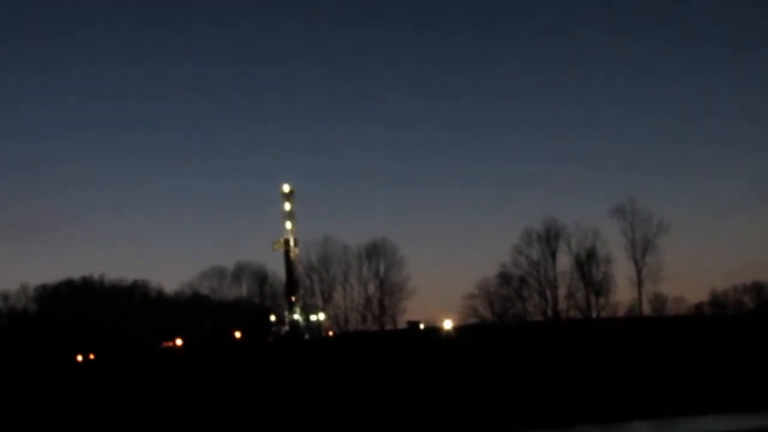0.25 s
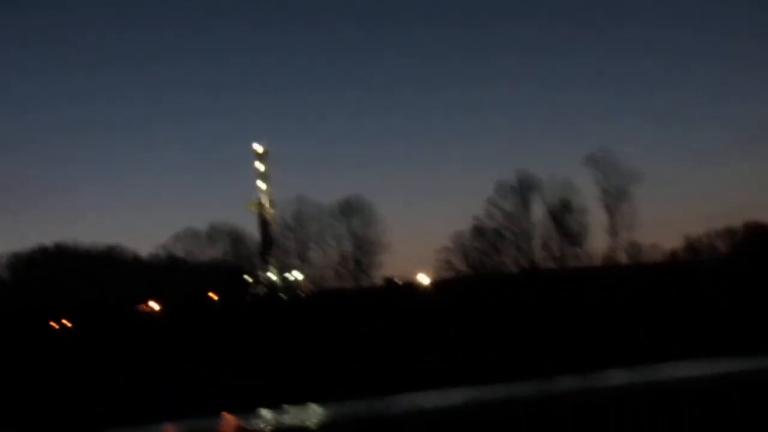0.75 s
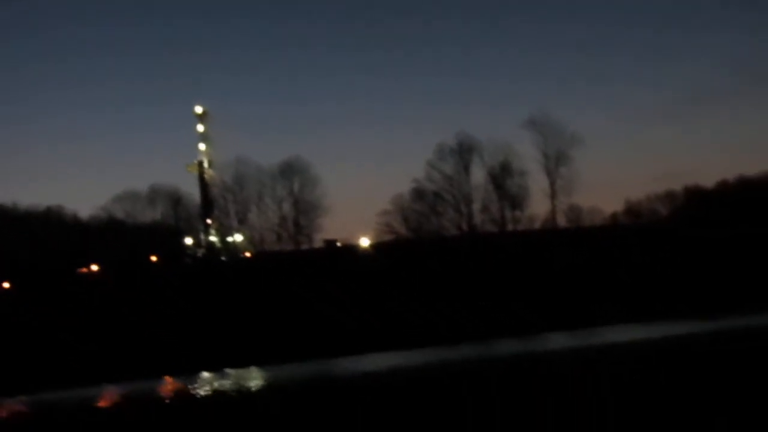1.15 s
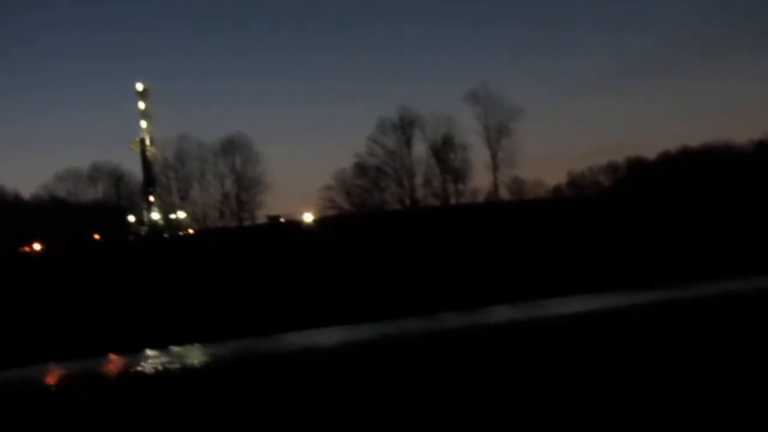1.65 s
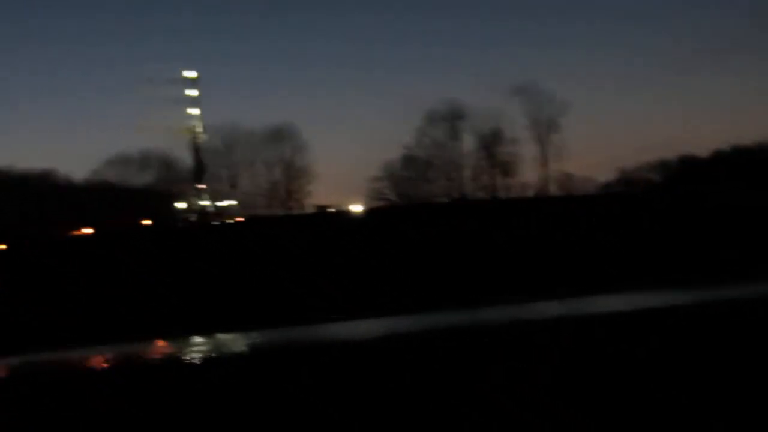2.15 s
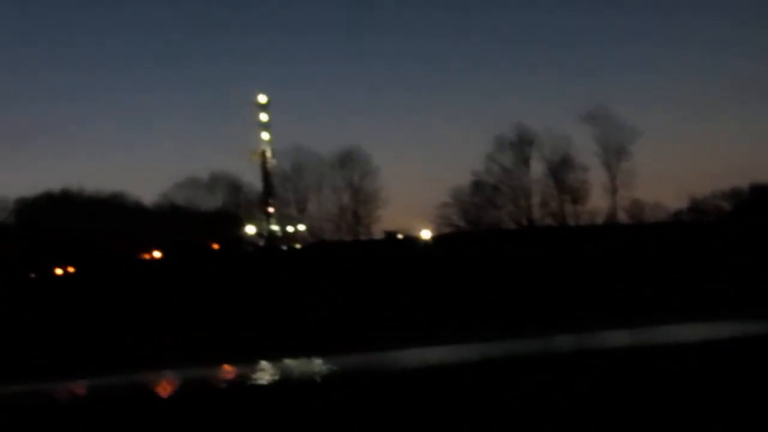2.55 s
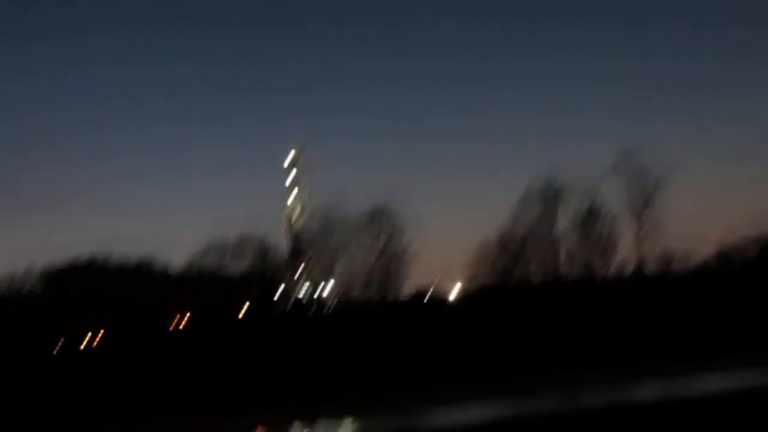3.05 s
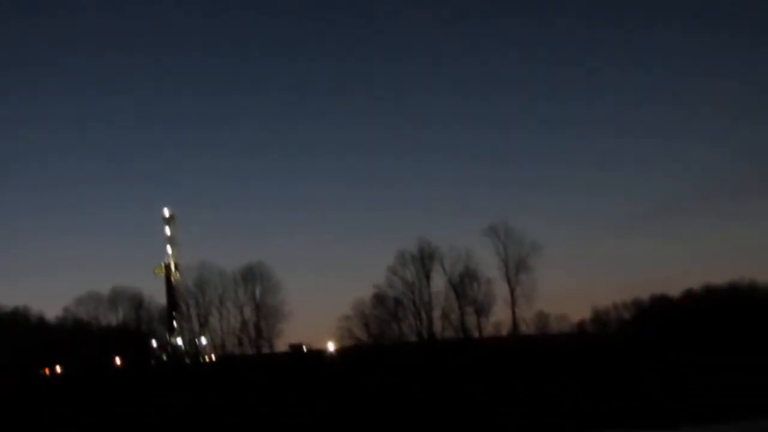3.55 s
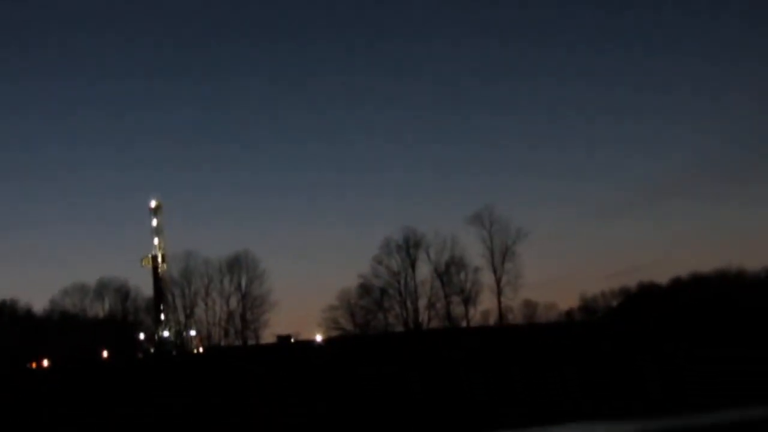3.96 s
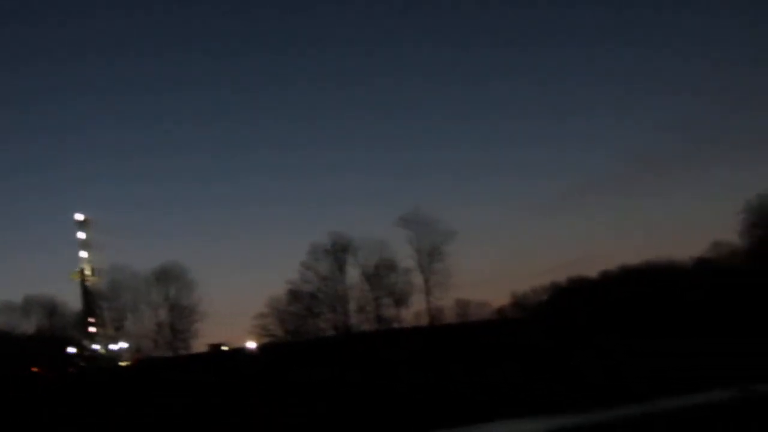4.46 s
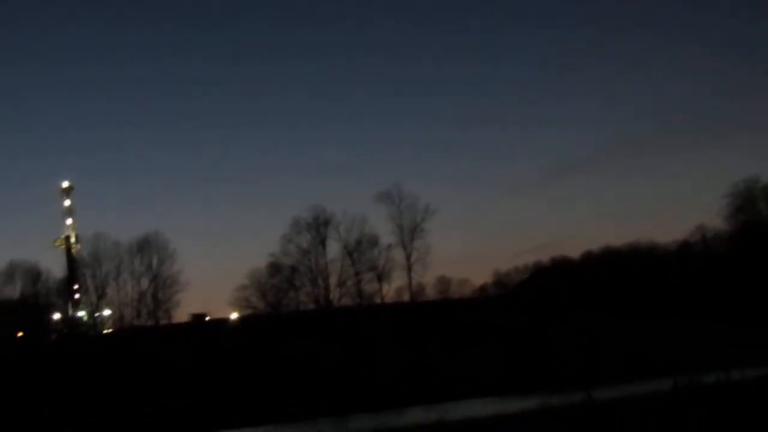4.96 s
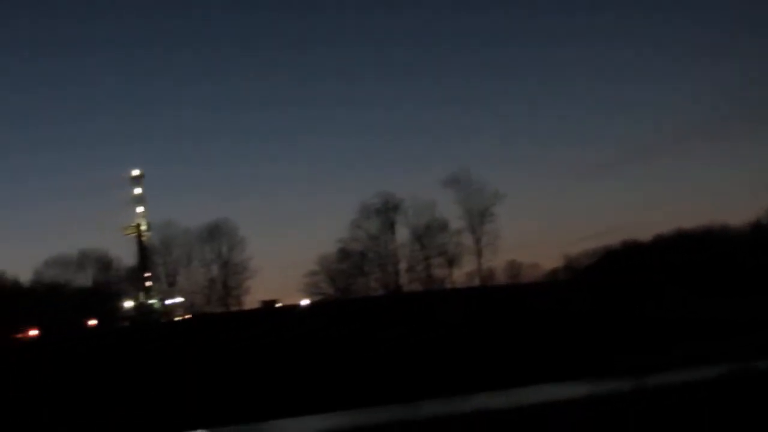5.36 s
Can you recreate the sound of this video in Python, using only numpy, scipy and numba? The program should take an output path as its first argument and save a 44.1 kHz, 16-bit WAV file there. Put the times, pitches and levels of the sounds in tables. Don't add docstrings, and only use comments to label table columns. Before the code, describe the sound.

Spring frogs whistle shrilly across a flooded field while a far drilling rig's engine hums, swells once and settles; light handling clicks sit up close.

```python
import sys
import numpy as np
from scipy import signal
from scipy.fft import rfft, irfft, next_fast_len
from scipy.io import wavfile
from scipy.ndimage import uniform_filter1d
from numba import njit

SR = 44100
rng = np.random.default_rng(int(sys.argv[2]) if len(sys.argv) > 2 else 0)


def level_to_linear(level):
    exponent = np.asarray(level, float) / 20
    return 10 ** exponent


def store_pcm(level_fs):
    pcm = np.round(np.clip(level_fs, -1, 1) * 32767).astype(np.int16)
    wavfile.write(sys.argv[1], SR, np.atleast_2d(pcm).T)


N = 246519
TIME = np.arange(N) / SR

# (time [s], level [dB], left minus right [dB])
CHORUS_LEVEL = [(0, -21, 2), (.4, -26.5, 7), (.8, -23.5, 4.5), (1.201, -25.5, 4), (1.6, -27, 3.5),
                (1.999, -26, 4.5), (2.4, -25.5, 5), (2.8, -23.5, 3), (3.199, -27, 3), (3.6, -27, 2.5),
                (4, -26.5, 3), (4.398, -24.5, 0.5), (4.8, -27, 2.5), (5.2, -27, 0), (5.6, -22.5, 3.5)]
GLIDE_RATES = [1600, 1850, 2050]


def walk(rate):
    knots = np.repeat(rng.standard_normal(int(N / SR * rate) + 2), 16)
    smooth = 1.3 * uniform_filter1d(uniform_filter1d(knots, 16), 16)
    return np.interp(TIME * rate * 16, np.arange(len(smooth)), smooth)


def sides(pan_db):
    return level_to_linear(np.array([pan_db, -pan_db]) / 2)


def unit(x):
    return x / np.sqrt(np.mean(x ** 2))


def field(load):
    # (frequency [Hz], level [dB per Hz])
    noise_floor = [(25, -65.5), (60, -62.5), (130, -65.5), (300, -71.5), (500, -73), (900, -77), (1400, -76),
                   (2100, -82), (3300, -87.5), (4100, -90.5),
                   (5000, -92), (7000, -97.5), (10000, -102.5), (12000, -104.5), (15500, -108)]
    # (frequency [Hz], side over mid [dB])
    stereo_width = [(25, -5), (100, -5.5), (500, -5.5), (1500, -2.5), (4000, -2), (8500, -1.5), (13000, 3)]
    size = next_fast_len(N)
    f = np.maximum(np.fft.rfftfreq(size, 1 / SR), 1)
    hz, db = np.transpose(noise_floor)
    colour = level_to_linear(np.interp(np.log(f), np.log(hz), db)) * np.sqrt(SR / 2) * (f > 18)
    noise = rfft(rng.standard_normal((2, size))) * colour
    width_hz, width_db = np.transpose(stereo_width)
    out = 0
    swell = walk(3.9)
    for centre in 20 * 2 ** np.arange(0, 10, .5):
        band = np.cos(np.pi / 2 * np.clip(2 * np.log2(f / centre), -1, 1)) ** 2
        mid, side = irfft(noise * band, size)[:, :N]
        wide = level_to_linear(np.interp(np.log(centre), np.log(width_hz), width_db))
        drift = level_to_linear(.5 * swell + 0.47 * walk(4.1))
        if 150 < centre < 2000:
            drift = drift * load ** 0.29
        lean_db = -2.2 if centre < 2000 else 1.5 if centre < 4500 else -.8
        ports = np.array([mid + wide * side, mid - wide * side]) / np.sqrt(1 + wide ** 2)
        out = out + drift * sides(lean_db)[:, None] * ports
    return out


def diesel():
    # (time [s], firing-cycle rate [Hz], load [dB])
    throttle = [(0, 32.9, 1.5), (0.297, 32.88, 0.5), (.6, 32.3, 0.5), (1.201, 33.1, 0.5), (2, 33.07, -0.5),
                (2.301, 37.32, 4.5), (2.48, 39.93, 5.5), (2.72, 40, 3.5), (2.9, 38.49, 3),
                (3.3, 34.55, -2.5), (3.7, 31.85, 2), (4.1, 33, -1), (5.6, 34.71, -1.5)]
    # (multiple of the cycle rate, level [dB])
    orders = [(1, -48.5), (2, -49.5), (3, -49), (4, -59), (5, -60), (6, -62), (9, -57.5), (10, -62),
              (11, -62), (22, -75), (23, -75)]
    # (frequency [Hz], level [dB])
    pumps = [(130, -53.5), (151, -62.5), (436, -58)]
    # (frequency [Hz], width [Hz], lift [dB])
    stack = [(98, 12, 5), (395, 35, 6), (900, 45, 16.5)]
    when, hz, load_db = np.transpose(throttle)
    rate = np.interp(TIME, when, hz)
    turn = 2 * np.pi * np.cumsum(rate * (1 + .002 * walk(6))) / SR
    load = level_to_linear(np.interp(TIME, when, load_db))
    tones, hums = np.zeros(N), np.zeros(N)
    for multiple, db in orders:
        lift_db = sum(peak_db * np.exp(-((multiple * rate - centre_hz) / width_hz) ** 2)
                      for centre_hz, width_hz, peak_db in stack)
        level = level_to_linear(db + 1.0 + lift_db + 2.5 * walk(4))
        tones += level * np.sin(multiple * turn + 1.47 * walk(4))
    for pump_hz, db in pumps:
        level = level_to_linear(db + 2.5 + 3.6 * walk(1.8))
        hums += level * np.sin(2 * np.pi * pump_hz * TIME + 2.22 * walk(6))
    return (tones * load + hums) * sides(-2.3)[:, None], load


def ticks():
    # (time [s], click level [dB], knock level [dB], contact [s])
    touches = [
        (.001, -55, -60, .003),
        (.2894, -59, -43, .009),
        (.4325, -62, -38, .002),
        (.4846, -44, -33, .0006),
        (.6894, -59, -60, .007),
        (.855, -56, -50, .014),
        (3.325, -60, -52, .006),
        (3.815, -61, -55, .005),
    ]
    out = np.zeros((2, N))
    t = np.arange(SR // 10) / SR
    bright = signal.butter(1, [5000 / (SR / 2), 15000 / (SR / 2)], "band")
    shell = np.sin(2 * np.pi * 1120 * t) + 0.64 * np.sin(2 * np.pi * 620 * t)
    knock = shell * np.exp(-t / 0.0014) * np.clip(t / .0003, 0, 1)
    for s, click_db, knock_db, contact in touches:
        scrape = signal.lfilter(*bright, rng.standard_normal((2, len(t))))
        click = scrape * t / contact * np.exp(1 - t / contact)
        at = int(s * SR)
        out[:, at:at + len(t)] += level_to_linear(click_db) * click + level_to_linear(knock_db + 12.5) * knock
    return out


@njit
def add_peep(out, at, size, hz, rise_hz, bend, swell, close, gains, start):
    half = 0.
    for i in range(size):
        u = i / size
        half += np.pi * (hz + rise_hz * ((1 + bend) * u - bend * u * u)) / SR
        opening = np.sin(np.pi / 2 * min(u / swell, 1.))
        closing = np.sin(np.pi / 2 * min((1 - u) / close, 1.))
        turn = np.exp(1j * half)
        step = opening * closing * turn
        for m in range(4):
            out[0, at + i] += gains[0, m] * (step * start[0, m]).imag
            out[1, at + i] += gains[1, m] * (step * start[1, m]).imag
            step *= turn


def whistle(peeps):
    throat = [-37, -3.5, -35.5, -45]
    bend, swell, close = .3, .36, .13
    lag_s, scatter_s = .0002, .00009
    early = .15
    lead = SR // 2
    out = np.zeros((2, N + 2 * lead))
    chances = rng.standard_normal((len(peeps), 3))
    for (s, length, hz, rise_hz, db, pan_db), chance in zip(peeps, chances):
        late = 2 * np.pi * hz * (lag_s + scatter_s * chance[1])
        phase = 10 * chance[0] - np.array([late, 0])
        start = np.exp(.5j * np.outer(phase, np.arange(1, 5)))
        partials = level_to_linear(np.array(throat) + 2.2 * chance[2] * np.array([1, 0, 1, 1]))
        gains = level_to_linear(db) * np.outer(sides(pan_db), partials)
        s -= early * length
        length *= 1 + early
        hz -= early * 1.2955 * rise_hz
        rise_hz *= 1 + early * 1.316
        at = lead + int(s * SR)
        add_peep(out, at, int(length * SR), hz, rise_hz, bend, swell, close, gains, start)
    return out[:, lead:lead + N]


def crowd(count=1100):
    c = np.clip(rng.standard_normal((count, 5)).T, -2.3, 2.3)
    s = (np.arange(count) + rng.random(count)) * (N / SR + .2) / count - .2
    length = 0.1406 + .02 * c[0]
    hz = 2550 + 105 * c[1]
    rise_hz = length * (1800 + 300 * c[2])
    peep_db = 3 * c[3] - 1.2 * c[1] ** 2
    far = whistle(np.transpose([s, length, hz, rise_hz, peep_db, 4.3 * c[4]]))
    when, db, pan_db = np.transpose(CHORUS_LEVEL)
    return unit(far) * level_to_linear(np.interp(TIME, when, db)) * sides(np.interp(TIME, when, pan_db))


def neighbours(count=70):
    c = np.clip(rng.standard_normal((count, 4)).T, -2, 2)
    s = (np.arange(count) + rng.random(count)) * N / SR / count
    length = .145 + 0.023 * c[0]
    hz = 2500 + 65 * c[1]
    db = -29.5 + 2.1 * c[2]
    return whistle(np.transpose([s, length, hz, GLIDE_RATES[1] * length, db, 2.8 + 5.5 * c[3]]))


def near():
    # (time [s], length [s], start pitch [Hz], peak level [dB])
    big_frogs = [(.005, .175, 2287, -31), (0.104, 0.21, 2355, -29), (.332, .15, 2190, -42),
                 (0.518, 0.13, 2385, -34.5), (.756, .17, 2310, -33), (0.897, .11, 2294, -34),
                 (1.219, .2, 2279, -38), (1.263, .09, 2346, -30), (1.609, 0.15, 2325, -32),
                 (1.833, 0.15, 2336, -35), (1.848, .1, 2236, -41), (2.079, 0.13, 2320, -28),
                 (2.203, 0.12, 2300, -25), (2.422, 0.12, 2338, -42), (2.64, 0.18, 2322, -32),
                 (2.986, .12, 2290, -35), (3.172, .15, 2358, -32), (3.22, 0.16, 2310, -27.5),
                 (3.392, .12, 2266, -33), (3.482, 0.15, 2213, -43), (3.558, .13, 2290, -36),
                 (3.856, 0.21, 2332, -32), (4.029, 0.17, 2318, -32.5), (4.177, .11, 2284, -25.5),
                 (4.314, .175, 2327, -33.5), (4.437, 0.15, 2273, -33), (4.943, 0.22, 2171, -39),
                 (5.024, .12, 2272, -29.5), (5.17, .11, 2304, -34), (5.327, 0.17, 2287, -29)]
    # (time [s], length [s], start pitch [Hz], peak level [dB])
    middle_frogs = [(.005, 0.11, 2562, -18), (0.209, 0.12, 2613, -22), (0.373, .15, 2678, -21),
                    (0.906, 0.16, 2533, -27), (0.981, 0.13, 2444, -21), (1.254, 0.14, 2650, -19),
                    (1.377, 0.17, 2383, -22), (1.414, 0.14, 2690, -18), (1.562, 0.16, 2518, -19),
                    (1.84, .11, 2580, -26), (1.886, .12, 2710, -19.5), (2.268, 0.16, 2474, -24.5),
                    (2.482, .14, 2460, -29), (2.561, 0.14, 2506, -19), (2.575, .14, 2644, -23.5),
                    (2.821, .16, 2400, -28), (3.156, .14, 2391, -21), (3.192, .14, 2692, -20.5),
                    (3.406, 0.086, 2666, -24), (3.433, 0.14, 2420, -21.5), (3.43, .16, 2513, -21.5),
                    (3.618, 0.19, 2435, -24), (3.904, .12, 2573, -20.5), (4.067, 0.17, 2416, -21),
                    (4.155, 0.11, 2541, -19), (4.49, .13, 2456, -20.5), (4.658, .11, 2470, -22),
                    (5.085, 0.16, 2683, -21.5), (5.424, .11, 2693, -20.5), (5.484, .12, 2597, -25)]
    # (time [s], length [s], start pitch [Hz], peak level [dB])
    small_frogs = [(0.063, 0.13, 2804, -33.5), (0.277, .11, 3060, -33), (0.538, 0.13, 2760, -30.5),
                   (0.973, 0.14, 2704, -26.5), (1.27, .1, 3060, -38), (1.261, 0.087, 2930, -32),
                   (1.646, 0.13, 2725, -25), (1.728, 0.13, 3050, -29.5), (1.839, .11, 2860, -39.5),
                   (2.193, .14, 2808, -32.5), (2.343, 0.12, 2740, -22.5), (2.734, 0.097, 3078, -33),
                   (2.951, 0.13, 2846, -23.5), (2.992, 0.14, 2995, -37), (3.037, .12, 2890, -37),
                   (3.444, 0.096, 2782, -23), (3.545, .1, 2827, -33), (3.676, 0.093, 2808, -29),
                   (3.963, 0.095, 2697, -33), (4.121, 0.097, 2870, -27), (4.123, .12, 3140, -36),
                   (4.322, 0.16, 2880, -36.5), (4.398, 0.16, 2985, -40), (4.753, 0.22, 2718, -36.5),
                   (5.197, .1, 2810, -32), (5.483, .11, 3060, -44.5)]
    seats_db = [-0.5, 1, 5]
    spread_db = 3.5
    when, _, pond_db = np.transpose(CHORUS_LEVEL)
    rows = []
    for frogs, glide, seat_db in zip((big_frogs, middle_frogs, small_frogs), GLIDE_RATES, seats_db):
        s, length, hz, db = np.transpose(frogs)
        pan_db = np.interp(s, when, pond_db) + seat_db + spread_db * rng.standard_normal(len(s))
        rows.append(np.transpose([s, length, hz, glide * length, db, pan_db]))
    return whistle(np.vstack(rows))


def treeline(x, t60=0.2, wet_db=-7):
    t = np.arange(SR // 3) / SR
    tail = rng.standard_normal((2, len(t))) * level_to_linear(-60 * t / t60) * (t > .004)
    tail /= np.sqrt(np.sum(tail ** 2) / 2)
    return x + level_to_linear(wet_db) * signal.fftconvolve(x, tail, axes=1)[:, :N]


def scene():
    engine, load = diesel()
    background = engine + field(load)
    frogs = crowd() + neighbours() + level_to_linear(-1.0) * near()
    return background + ticks() + treeline(frogs)


def top_cut(x):
    return signal.sosfilt(signal.butter(12, 15740, fs=SR, output="sos"), x)


def record(dry):
    return top_cut(dry)


dry = scene()
out = record(dry)
store_pcm(out)
```